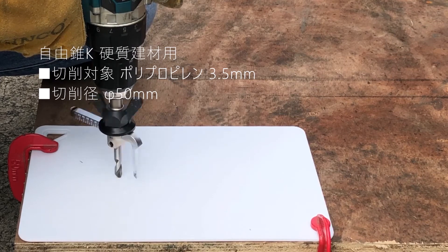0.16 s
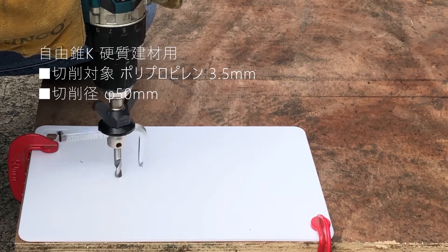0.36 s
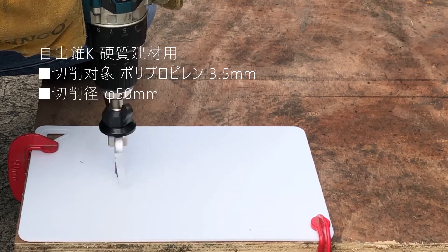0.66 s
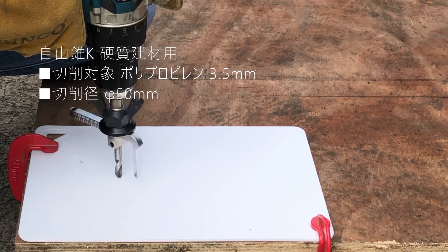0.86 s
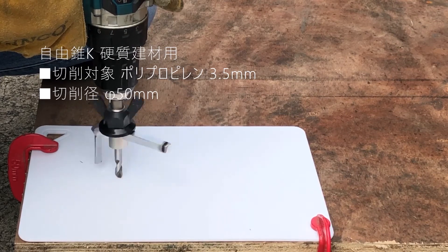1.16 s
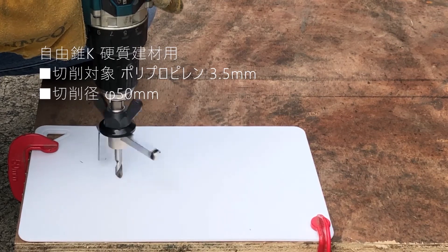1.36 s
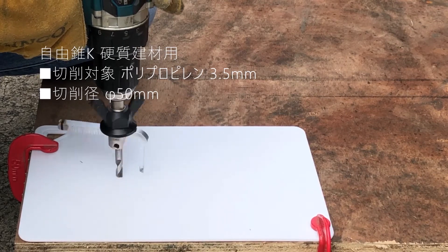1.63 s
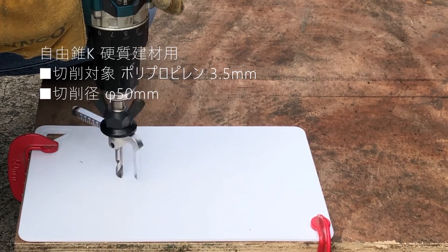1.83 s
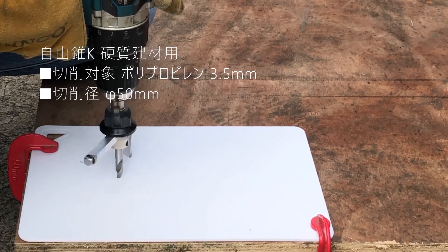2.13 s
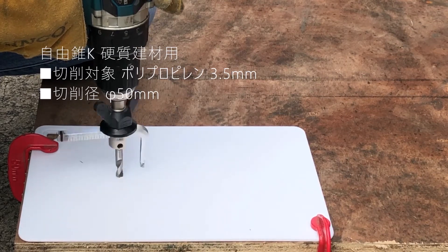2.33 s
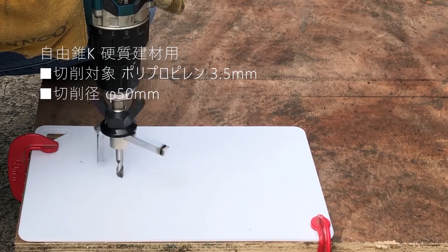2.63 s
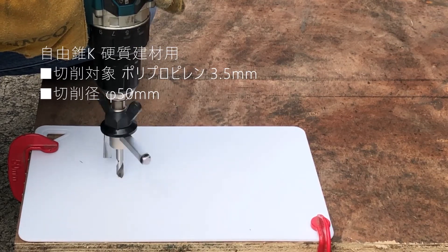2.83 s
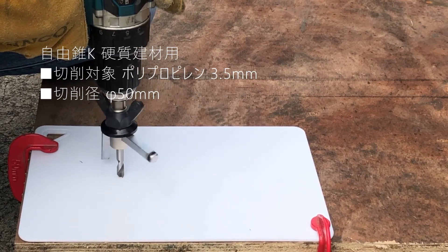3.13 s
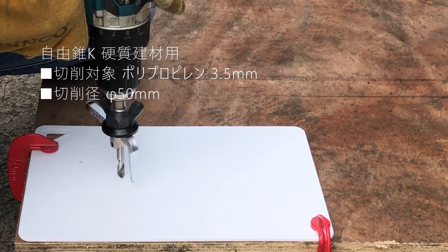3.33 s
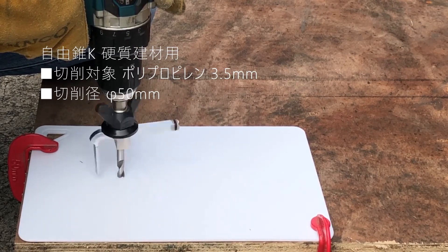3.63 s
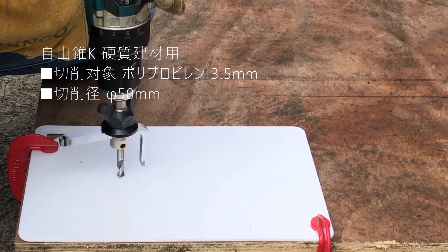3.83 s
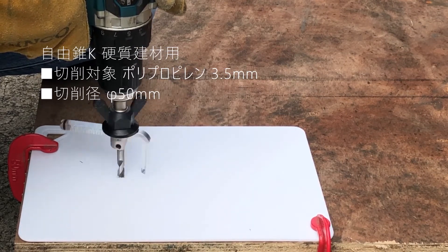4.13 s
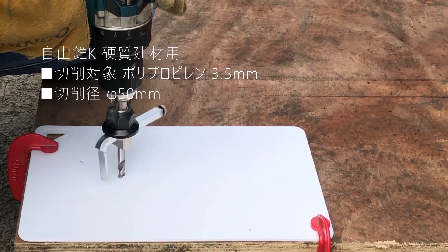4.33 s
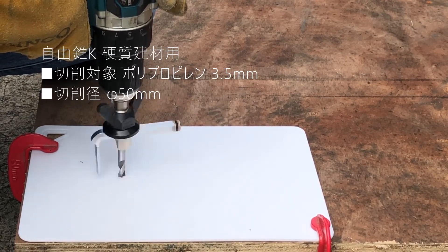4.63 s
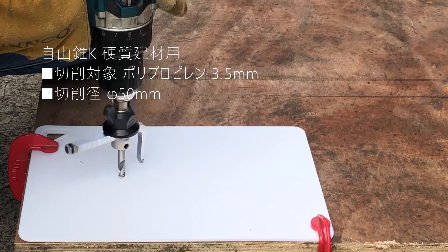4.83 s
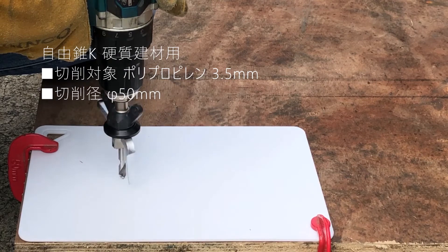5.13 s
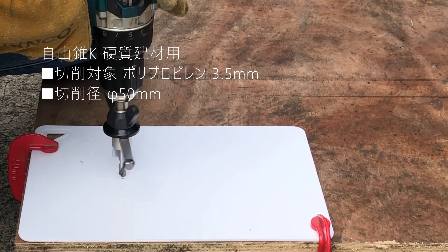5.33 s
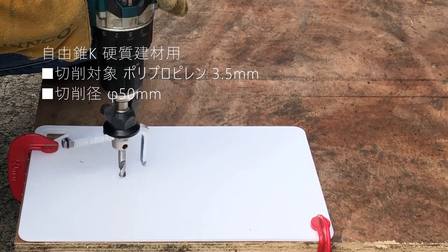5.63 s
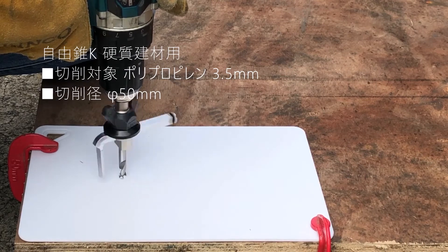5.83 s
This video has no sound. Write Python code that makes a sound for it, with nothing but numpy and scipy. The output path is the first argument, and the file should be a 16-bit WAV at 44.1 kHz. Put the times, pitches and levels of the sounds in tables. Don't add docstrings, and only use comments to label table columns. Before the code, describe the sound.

A cordless drill whines close by, its pitch climbing in uneven steps over rattling gears and hissing cooling air, with one sharp tap.

```python
import sys
import numpy as np
from scipy import signal
from scipy.fft import rfft, irfft, next_fast_len
from scipy.io import wavfile
from scipy.ndimage import uniform_filter1d, map_coordinates

SR = 44100
rng = np.random.default_rng(int(sys.argv[2]) if len(sys.argv) > 2 else 0)


def decibels_to_gain(level_db):
    exponent = np.asarray(level_db, float) / 20
    return 10 ** exponent


def materialize(psi):
    bounded = np.clip(np.atleast_2d(psi).T, -1, 1)
    quanta = np.round(bounded * 32767).astype(np.int16)
    wavfile.write(sys.argv[1], SR, quanta)


N = 263718


def unit(x):
    return x / np.sqrt(np.mean(x ** 2) + 1e-20)


def wobble(rate):
    knots = rng.standard_normal(int(N * rate / SR) + 4)
    return map_coordinates(knots, [np.arange(N) * rate / SR])


def filtered(x, response):
    m = next_fast_len(N + 8192)
    return irfft(rfft(x, m) * response(np.fft.rfftfreq(m, 1 / SR)), m)[:N]


def coloured(spectrum):
    f, db = np.transpose(spectrum)
    return lambda hz: decibels_to_gain(np.interp(np.log(hz + 1), np.log(f + 1), db))


def resonant(modes):
    def response(hz):
        total = 0
        for k, (centre, width, db) in enumerate(modes):
            damping = 1j * hz * width
            total = total + (-1) ** k * decibels_to_gain(db) * damping / (centre ** 2 - hz ** 2 + damping)
        return total
    return response


def bumps(rows, x):
    return sum(height * np.exp(-(2 * (x - centre) / width) ** 2) for centre, width, height in rows)


SWITCH_OFF_S, SWITCH_FADE_S = 0.529, 0.09


def switching():
    return np.clip((SWITCH_OFF_S - np.arange(N) / SR) / SWITCH_FADE_S, 0, 1)


SLOW_HZ, FULL_PUSH_HZ_PER_S = 272, 500


def level(law, speed_hz):
    slow_db, grows_db, chop_db, push_db = law
    climb = uniform_filter1d(np.gradient(speed_hz) * SR, size=SR // 8)
    push = np.clip(climb / FULL_PUSH_HZ_PER_S, -1, 1)
    return slow_db + grows_db * np.log2(speed_hz / SLOW_HZ) + chop_db * switching() + push_db * push


# [start_s, shaft_turns_hz]
TRIGGER = [(0.0, 272.2), (0.819, 266), (1.103, 331.2), (1.678, 332.3), (2.302, 383.5), (2.629, 333.6),
           (2.973, 345.2), (3.106, 474.8), (3.703, 498.8), (3.907, 455.3), (4.311, 419.1), (4.839, 457.9),
           (4.91, 437.3), (4.961, 463.2), (5.235, 490.7), (5.464, 470.4), (5.792, 465.2), (5.955, 491.3)]
# [centre_s, change_hz, length_s]
TWITCHES = [(0.302, 3.5, 0.232), (0.514, 4.5, 0.07), (0.606, -6, 0.063), (0.872, 4.5, 0.0592),
            (0.963, -4, 0.049), (1.117, -11.5, 0.27), (1.737, 4, 0.08), (1.849, -5, 0.1),
            (2.328, -14.0, 0.338), (2.428, 4, 0.0789), (2.636, 7, 0.13), (2.892, -6.3, 0.08),
            (3.051, -14.0, 0.04), (3.104, -6.5, 0.039), (3.232, -7, 0.09), (3.447, -9.5, 0.13),
            (3.669, -5, 0.12), (3.783, -9.5, 0.0906), (3.858, -9.5, 0.05), (4.017, -5.5, 0.05),
            (4.069, 4.5, 0.04), (4.143, -9, 0.0578), (4.171, 8.5, 0.11), (4.378, 10, 0.08),
            (4.533, -3.5, 0.041), (4.665, 7.1, 0.336), (5.093, 14.0, 0.31), (5.79, 5.1, 0.05)]


def speed():
    t = np.arange(N) / SR
    start_s, shaft_hz = np.transpose(TRIGGER)
    trigger_hz = np.interp(t, start_s, shaft_hz)
    inertia_s = 0.03
    slips = bumps([(s, length, hz) for s, hz, length in TWITCHES], t)
    return uniform_filter1d(trigger_hz, size=round(inertia_s * SR), mode="nearest") + slips


# [pitch_hz, width_hz, level_db]
FAN_NULLS = [(6067, 230, -6), (6730, 346, -7), (7345, 280, -12.5), (8190, 278, -11), (8987, 410, -3.5),
             (9656, 640, -7.5), (10471, 648, -4.5), (11323, 465, -10.5)]
# [pitch_hz, width_hz, level_db]
SHELL = [(940, 37.2, 11), (1082, 216, 16), (1174, 61, 7.5), (1300, 99, 7), (1435.6, 104.7, 5),
         (1593, 170, 4), (1722, 130, 2.5), (1850, 204, -11), (1921, 70, 3), (2097, 170, 14),
         (3699.2, 280, 8.5), (4240, 300, 4), (5054, 400, 6), (5830, 600, 12)]
ORDER_COUNTS = (1, 2, 8, 12, 16, 22, 46)
# [slow_db, per_doubling_db, switching_db, full_push_db]
ORDER_LAWS = [(-68.5, 17.5, 3, 0), (-80, 21, -2, -1.5), (-62, 10.5, -19, 9), (-57, -9.5, 11.5, -2),
              (-53.5, -5, 5.5, 2), (-67.5, 22, -10, .3), (-54.5, 21, -3, -3.7)]
FAN_BLADES, POLES = 23, 4
FAN_LAW, POLE_LAW = (-39.5, 21, 3, -0.7), (-57.5, 17.5, 1.5, 0.5)


def whine(turns, speed_hz):
    fan_db = level(FAN_LAW, speed_hz) + bumps(FAN_NULLS, FAN_BLADES * speed_hz)
    pole_db = level(POLE_LAW, speed_hz) + bumps(SHELL, POLES * speed_hz)
    jitter = 0.007 * wobble(60)

    def tone(per_turn, db):
        return np.sqrt(2) * decibels_to_gain(db) * np.sin(2 * np.pi * per_turn * (turns + jitter))

    fan = tone(FAN_BLADES, fan_db - 0.2 + 1.0 * wobble(14) + 1.3 * wobble(35))
    poles = tone(POLES, pole_db - 0.2 + 1.5 * wobble(12) + 1.7 * wobble(30))
    lesser = 0
    for count, law in zip(ORDER_COUNTS, ORDER_LAWS):
        order_db = level(law, speed_hz) + bumps(SHELL, count * speed_hz)
        lesser = lesser + tone(count, order_db - 1.2 + 2.6 * wobble(22))
    return fan + poles + lesser


# [pitch_hz, level_db]
SWITCHING = [(6800, -49.5), (14700, -49)]


def controller():
    t = np.arange(N) / SR
    linger_db, linger_end_s = -7, 0.895
    linger = decibels_to_gain(linger_db) * np.clip((linger_end_s - t) / SWITCH_FADE_S, 0, 1)
    tones = 0
    for hz, db in SWITCHING:
        strength = decibels_to_gain(db + 0.5 + 2.8 * wobble(19))
        tones = tones + strength * np.sin(2 * np.pi * hz * t + 0.66 * wobble(40))
    return np.maximum(switching(), linger) * tones


def knocks(turns, per_turn, spread_db):
    contacts = turns * per_turn
    strength = decibels_to_gain(spread_db * rng.standard_normal(N))[contacts.astype(int)]
    return strength * np.exp(-2.2 * (contacts % 1))


# [pitch_hz, width_hz, level_db]
HOUSING = [(4424.7, 610, -7), (5212.4, 289.0, -1.0), (5580, 184.0, -2.0), (6205, 940, -6.5)]
# [pitch_hz, width_hz, level_db]
GEARBOX = [(980, 345, -3), (1327, 226, -1.5), (2045, 640, -4), (3093, 196, 0.5), (3802, 514, -0.5)]
RATTLE_LAW, GROWL_LAW = (-36, 8.5, -0.5, 0.6), (-48.5, 10, -0.5, 0.2)


def gears(turns, speed_hz, chuck):
    contact = knocks(turns, per_turn=1.7, spread_db=1.5)
    sharp = contact ** 1.1 * rng.standard_normal(N)
    blunt = contact ** 0.6 * rng.standard_normal(N)
    rattle_db = level(RATTLE_LAW, speed_hz) - 0.32 + 0.51 * chuck
    growl_db = level(GROWL_LAW, speed_hz) + 6.0 + 0.554 * chuck
    rattle = decibels_to_gain(rattle_db) * unit(filtered(sharp, resonant(HOUSING)))
    growl = decibels_to_gain(growl_db) * unit(filtered(blunt, resonant(GEARBOX)))
    return rattle + growl


# [pitch_hz, level_db per Hz]
AIR = [(200, -45), (500, -23), (1500, -1), (3000, 3.5), (6000, 4), (8000, 11), (10000, 9.5), (12500, 10.5),
       (14400, 5.5), (15500, 11), (16000, 9)]
AIR_LAW = (-51.5, 18.5, 0.01, 0)


def cooling_air(speed_hz, chuck):
    hiss = filtered(rng.standard_normal(N), coloured(AIR))
    gusty = unit(hiss * decibels_to_gain(0.97 * wobble(70)))
    return decibels_to_gain(level(AIR_LAW, speed_hz) + 9.5 + 0.29 * chuck) * gusty


# [delay_s, gain]
BENCH = [(.00142, 0.2), (.00197, 0.069), (.00215, .04), (.00032, -0.099)]


def reflected(x):
    return filtered(x, lambda hz: 1 + sum(gain * np.exp(-2j * np.pi * hz * s) for s, gain in BENCH))


def drill():
    speed_hz = speed()
    turns = np.cumsum(speed_hz) / SR
    chuck = wobble(7)
    noise = gears(turns, speed_hz, chuck) + cooling_air(speed_hz, chuck)
    return whine(turns, speed_hz) + controller() + reflected(noise)


# [pitch_hz, level_db per Hz]
ROOM = [(12, -45), (20, -40), (43, -4), (92, -4), (115, -1.5), (135, -5.5), (236, -8), (273, -8),
        (412, -14), (499, -14.5), (732, -21.5), (900, -14.5), (1170, -24), (1980, -120)]
# [pitch_hz, level_db]
MAINS = [
    (59, -54.5),
    (118, -58.5),
]


def room():
    t = np.arange(N) / SR
    hum = 0
    for hz, db in MAINS:
        strength = decibels_to_gain(db + 3 + 2.3 * wobble(4.03))
        hum = hum + strength * np.sin(2 * np.pi * hz * t + 0.44 * wobble(5))
    rumble_db = -42 + np.interp(t, [0, 1.5], [-1.2, 0]) + 1.1 * wobble(6)
    return hum + decibels_to_gain(rumble_db) * unit(filtered(rng.standard_normal(N), coloured(ROOM)))


# [start_s, peak_db]
TICKS = [
    (1.8386, -28),
    (2.2475, -14.5),
]


def ticks():
    t = np.arange(N) / SR
    bursts = sum(decibels_to_gain(db - 60 * np.clip(t - s, 0, 1) / 0.009) * (t >= s) for s, db in TICKS)
    return bursts * unit(filtered(rng.standard_normal(N), resonant([(4315, 2200, 0)]))) * decibels_to_gain(-3.0)


def scene():
    return np.tile(drill() + room() + ticks(), (2, 1))


def local_rms(lines, size):
    return np.sqrt(np.abs(uniform_filter1d(lines ** 2, size=size, axis=1)) + 1e-12)


def slice_basis(window):
    hop = len(window) // 2
    phase = np.outer(np.arange(hop) + 0.5, np.arange(2 * hop) + 0.5 + hop / 2)
    return np.sqrt(2 / hop) * window * np.cos(np.pi / hop * phase)


def alter(x, start_s, first, basis, change):
    hop = len(basis)
    centre = first + hop * round((start_s * SR - first) / hop)
    part = x[:, centre - hop:centre + hop]
    lines = part @ basis.T
    part += (change(lines) - lines) @ basis


# [start_s, step_db over the slice's rms]
STARVED = [(.106, 15), (.212, 12), (.361, 16.5), (.959, 15.5), (1.472, 14.5), (1.898, 14), (1.9195, 15.5),
           (2.112, 12), (2.516, 14), (3.541, 16), (3.669, 14.5), (3.6905, 14.5), (5.033, 16.5),
           (5.0545, 15), (5.332, 15)]


def starve(x):
    hop, first = 941, 890
    basis = slice_basis(signal.windows.cosine(2 * hop))
    hz = np.arange(hop) * SR / (2 * hop)
    low_middle = np.where((hz > 300) & (hz < 3900), decibels_to_gain(2.0), 1)

    def rounded(lines, db):
        rms = lines.std()
        step = decibels_to_gain(db) * rms * (local_rms(lines, size=121) / rms) ** 0.3 * low_middle
        return step * np.round(lines / step)

    for s, db in STARVED:
        alter(x, s, first, basis, lambda lines: rounded(lines, db))


# [start_s, low_hz, high_hz]
FILLED = [(.238, 9600, 11000), (.725, 8300, 10400), (1.353, 5650, 7600), (1.701, 9600, 11100),
          (1.794, 14400, 15800), (2.189, 6250, 7600), (2.909, 4550, 5650), (2.909, 13800, 15100),
          (2.932, 4150, 5200), (2.932, 11000, 13000), (3.118, 5700, 6900), (3.118, 10300, 11700),
          (3.745, 10300, 12400), (4.65, 13050, 15150), (4.697, 4550, 6200), (4.813, 4150, 5150),
          (4.813, 6200, 7550), (5.231, 7550, 9000), (5.231, 13050, 14450), (5.44, 4650, 5650),
          (5.858, 7600, 8950)]


def fill(x):
    hop, first = 1024, 272
    basis = slice_basis(signal.windows.kaiser_bessel_derived(2 * hop, 4 * np.pi))
    hz = np.arange(hop) * SR / (2 * hop)
    for s, low_hz, high_hz in FILLED:
        noise = rng.standard_normal((2, hop))
        band = (hz > low_hz) & (hz < high_hz)
        alter(x, s, first, basis, lambda lines: np.where(band, noise * local_rms(lines, size=25), lines))


def band_limit(x):
    return signal.sosfilt(signal.butter(12, 16380, fs=SR, output="sos"), x)


def record(dry):
    limited = [filtered(channel, lambda hz: hz < 15740) for channel in dry]
    x = np.pad(limited, ((0, 0), (0, 2048)))
    starve(x)
    fill(x)
    return band_limit(x[:, :N])


dry = scene()
out = record(dry)
materialize(out)
```